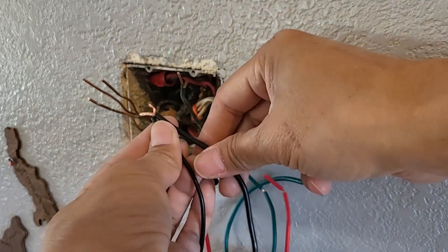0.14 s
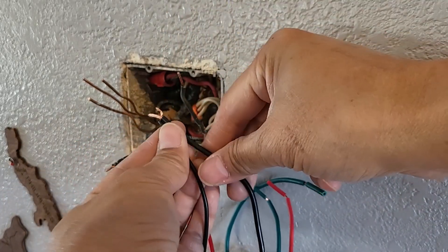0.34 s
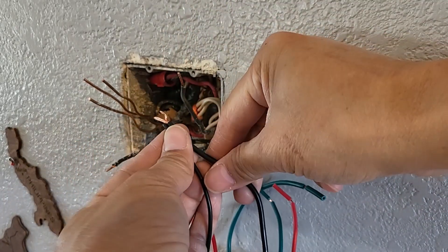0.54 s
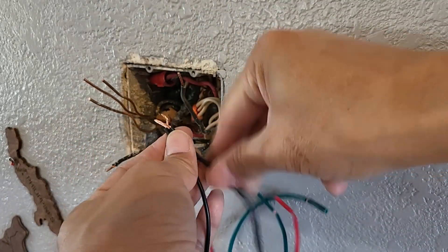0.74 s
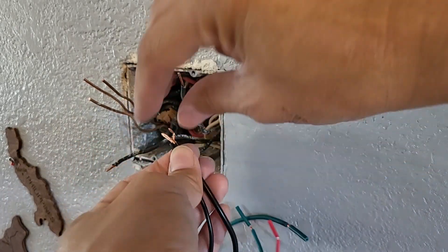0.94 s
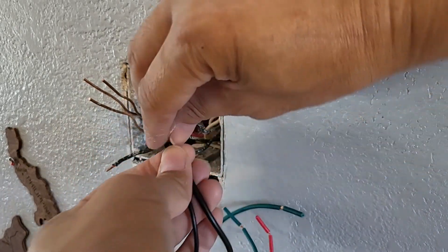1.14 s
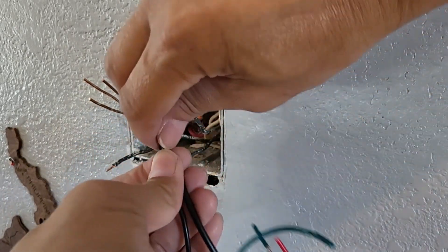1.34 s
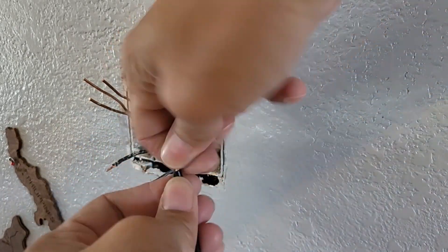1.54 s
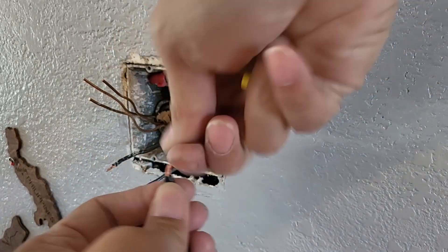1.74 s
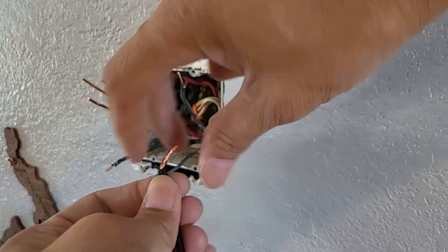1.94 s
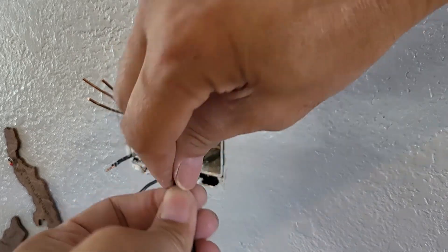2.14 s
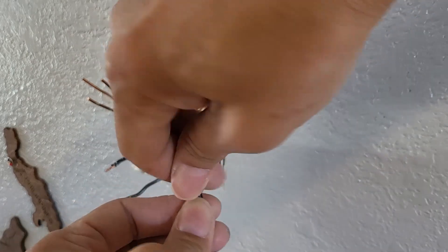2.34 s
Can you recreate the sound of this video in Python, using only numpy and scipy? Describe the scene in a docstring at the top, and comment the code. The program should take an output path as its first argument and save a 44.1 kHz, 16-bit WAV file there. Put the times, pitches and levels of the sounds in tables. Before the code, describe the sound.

Stiff copper wires handled at a wall box, with light knocks, scrapes and a bright chatter.

```python
"""In a small room, hands work on stiff copper wires at a junction box in a hollow wall, close by.
Cables scrape and rustle over the box, tick against it and thump the wall behind it.
Bare wire ends hit each other with a bright chatter, then fingers twist them together with faint
rubs, squeaks and ticks. Hits make things ring; sliding things catch and slip many times a second.
Soft air noise and a low hum lie under it all."""
import sys
import numpy as np
from scipy import signal
from scipy.fft import rfft, irfft, next_fast_len
from scipy.io import wavfile
from scipy.ndimage import map_coordinates

SR = 44100
rng = np.random.default_rng(int(sys.argv[2]) if len(sys.argv) > 2 else 0)


def store_wav(level_fs):
    """Save 16-bit WAV to argv[1]."""
    pcm = np.round(np.clip(np.atleast_2d(level_fs), -1, 1) * 32767)
    wavfile.write(sys.argv[1], SR, pcm.T.astype(np.int16))


N = 105840
T = np.arange(SR // 2) / SR  # the half-second clock of one sound [s]
TICK_ATTACK_S, SCRAPE_TOP_HZ = 0.00095, 3480
BOX_PAN_DB, FINGER_PAN_DB = -1.1, -0.2  # below zero leans right

# the notes the box rings at (pitch [Hz], level [dB], time to fade by 60 dB [s])
BOX_NOTES = [(1162, -11, 0.062), (1804, -14.5, 0.1), (2556, -11, 0.061), (2910, -1, 0.035),
             (3680, -15.5, 0.027), (5454, -8.5, 0.052), (7215, -7, 0.018)]
# the tone of skin sliding on wire (frequency [Hz], level [dB])
SKIN_TONE = [(500, 1), (2000, 0), (4500, -5), (7400, -2), (8800, -13.5), (12500, -12), (15500, -12.5)]


def amp(db):
    """Turn decibels into a number to multiply by."""
    return 10 ** (np.asarray(db) / 20)


def unit(x):
    """Scale a sound to an average (rms) strength of 1."""
    return x / np.sqrt(np.mean(x ** 2) + 1e-20)


def along(points, hz):
    """Read between (frequency, value) points, spaced the way we hear pitch."""
    f, v = np.transpose(points)
    return np.interp(np.log(hz + 1), np.log(f + 1), v)


def filtered(x, response):
    """Turn each frequency of x up or down by response(hz)."""
    n = x.shape[-1]
    m = next_fast_len(n + 8192)
    return irfft(rfft(x, m) * response(np.fft.rfftfreq(m, 1 / SR)), m)[..., :n]


def octaves(hz):
    """Octaves above 3000 Hz; everything under 500 Hz counts as 500 Hz."""
    return np.log2(np.maximum(hz, 500) / 3000)


def noise(tone, size, tilt=0):
    """Two unrelated noises with the given tone; tilt brightens them [dB per octave]."""
    white = rng.standard_normal((2, size))
    return unit(filtered(white, lambda hz: amp(along(tone, hz) + tilt * octaves(hz))))


def spread(pair):
    """Sound from all around: alike at both ears in the bass, unrelated in the treble."""
    # how alike left and right are (frequency [Hz], likeness [-1 to 1])
    likeness = [(60, 0.89), (200, 0.96), (550, -0.48), (1600, -0.32), (5000, -0.019)]
    turn = lambda hz: np.arccos(np.clip(along(likeness, hz), -1, 1)) / 2
    mid, side = filtered(pair, lambda hz: np.array([np.cos(turn(hz)), np.sin(turn(hz))]))
    return np.array([mid + side, mid - side])


def ring(notes, tilt=0, detune=0):
    """A struck thing rings with fading notes, a little different on every hit."""
    out = np.zeros((2, len(T)))
    for hz, db, fade_s in notes:
        level = amp(db + tilt * octaves(hz) + 2.5 * rng.standard_normal() - 60 * T / fade_s)
        pitch = hz * (1 + detune * rng.standard_normal())
        phase = rng.random() + 0.49 * rng.random((2, 1))  # each ear gets its own [cycles]
        out += level * np.sin(2 * np.pi * (pitch * T + phase))
    return out


def resonances(peaks, f):
    """How a body that favours some pitches answers at frequency f."""
    return sum((-1) ** k * amp(db) * 1j * f * width / (hz * hz - f * f + 1j * f * width)
               for k, (hz, width, db) in enumerate(peaks))


def stroke(length, body, smooth, slips_per_s=1300):
    """One slide: tiny random slips and some smooth hiss shake a body, swelling then fading."""
    slips = (rng.random(len(T)) < slips_per_s / SR) * amp(3 * rng.standard_normal(len(T)))
    grains = unit(slips * rng.standard_normal((2, len(T))))
    hiss = smooth * rng.standard_normal((2, len(T)))
    swell = np.interp(T / length, [0, 0.5, 1], [0, 1, 0]) ** 0.44
    return unit(filtered(grains + hiss, body)) * swell


def room_echo(echo_db):
    """The room's answer to a click: many reflections blur into fading noise."""
    # how long the room rings (frequency [Hz], time to fade by 60 dB [s])
    fade_times = [(100, 0.48), (260, 0.22), (700, 0.32), (1800, 0.38), (5000, 0.46), (12000, 0.24)]
    # the tone of the echo (frequency [Hz], level [dB])
    echo_tone = [(80, 1.5), (250, -8.5), (600, 3.5), (1800, -3), (5500, -5.5), (12000, -4)]
    hz, t, bands = signal.stft(rng.standard_normal((2, len(T))), SR, nperseg=256)
    fade_s = along(fade_times, hz)[:, None]
    tail = signal.istft(bands * amp(-60 * t / fade_s) / np.sqrt(fade_s), SR, nperseg=256)[1]
    tail = tail[:, :len(T)] * (1 - np.exp(-T / 0.0037))  # reflections build up
    tail = spread(tail / np.linalg.norm(tail[0]))
    tail = filtered(tail, lambda f: amp(along(echo_tone, f) + echo_db))
    return np.pad(tail, ((0, 0), (SR // 200, 0)))  # arrives 5 ms late


def add(out, s, sound, pan_db, echo_db):
    """Place a sound at s seconds, with its own room echo."""
    direct = sound * amp([[pan_db], [-pan_db]])
    echo = signal.fftconvolve(sound, room_echo(echo_db), axes=1)[:, :len(T)]
    start = round(s * SR)
    heard = (direct + echo)[:, max(-start, 0):N - start]
    out[:, max(start, 0):][:, :heard.shape[1]] += heard


def room_tone(air_db=-58.5, hum_hz=47.44, hum_db=-62.5):
    """Soft air noise and a low, slightly unsteady hum."""
    # the tone of the air noise (frequency [Hz], level [dB])
    air_tone = [(18, -46), (36, -25.5), (70, -7), (140, -14.5), (195, -7.5), (340, -14), (520, -22),
                (750, -21.5), (1100, -30), (1500, -33.5), (2900, -39), (4300, -48), (7400, -47.5),
                (8800, -62.5), (15500, -52)]
    t = np.arange(N) / SR
    drift = map_coordinates(rng.standard_normal(16), [t * 4])
    hum = np.sqrt(2) * np.sin(2 * np.pi * hum_hz * t + 0.083 * drift)
    air = unit(spread(noise(air_tone, N)))
    return amp(air_db) * air + amp(hum_db) * hum


def scrapes():
    """A cable catches and slips as it drags over the edge of the box."""
    # each drag (time [s], length [s], level [dB])
    drags = [(-.03, 0.11, -65.5), (.08, 0.086, -66), (0.319, 0.11, -71.5), (0.799, 0.1, -57.5),
             (0.932, 0.014, -44.5), (0.944, 0.019, -42), (0.953, 0.043, -48.5), (1.017, 0.016, -42),
             (1.04, 0.15, -73.5)]
    # pitches the scraped box favours (pitch [Hz], width [Hz], level [dB])
    edge_peaks = [(1130, 39, -12), (1465, 60, 11), (1848, 59, 13.5), (2240, 170, -2.5), (2575, 190, 3),
                  (2900, 1800, -1)]
    edge = lambda f: resonances(edge_peaks, f) / (1 + (f / SCRAPE_TOP_HZ) ** 2)
    out = np.zeros((2, N))
    for s, length, db in drags:
        add(out, s, amp(db) * stroke(length, edge, smooth=0.3), BOX_PAN_DB, echo_db=-5.5)
    return out


def squeaks(width_hz=180):
    """Copper slides on copper and squeaks around one pitch."""
    # each squeak (time [s], length [s], pitch [Hz], level [dB])
    slides = [(0.085, 0.0076, 3018, -46), (1.54, 0.012, 3103, -55.5), (1.539, 0.015, 2095, -55.5),
              (1.722, 0.095, 2710, -73), (1.786, 0.029, 1915, -62), (1.823, 0.028, 2070, -66),
              (2.114, 0.02, 4640, -71.5)]
    out = np.zeros((2, N))
    for s, length, hz, db in slides:
        peak = lambda f: resonances([(hz, width_hz, 0)], f) ** 2
        add(out, s, amp(db) * stroke(length, peak, smooth=0.3), FINGER_PAN_DB, echo_db=-14)
    return out


def box_tick(tilt, crack_db=3.5, crack_fade_s=0.044):
    """The tapped box rings and cracks; each spot on it favours other frequencies."""
    # the tone of the crack (frequency [Hz], level [dB])
    crack_tone = [(300, 2.5), (900, -5), (3000, -6), (4600, -7.5), (5800, -6.5), (7400, -11.5), (8800, -25),
                  (15000, -36)]
    notes = ring(BOX_NOTES, tilt)
    crack = amp(crack_db - 60 * T / crack_fade_s) * noise(crack_tone, len(T), tilt)
    spot_tone = [(hz, 3.5 * rng.standard_normal()) for hz in np.geomspace(700, 9000, 16)]
    tick = filtered(notes + crack, lambda hz: amp(along(spot_tone, hz)))
    return tick * (1 - np.exp(-T / TICK_ATTACK_S))


def knocks(push_s=0.0026, wall_lag_s=0.001084, bass_cut_hz=62):
    """A cable ticks the box, then thumps the wall; hard hits also ring the hollow of the box."""
    # each hit (time [s], tick level [dB], brightness [dB per octave], thump level [dB])
    hits = [(0.088, -53, -1.5, -57), (0.1203, -53, -1.5, -52), (0.2297, -45.5, 1.5, -20),
            (0.2382, -56.5, 0.5, -45), (.298, -74, -8, -31.5), (.352, -65.5, -4.5, -43),
            (0.3809, -68, -4, -38.5), (0.4467, -60, -6, -39), (0.4679, -58.5, -4.5, -38.5),
            (0.5466, -61.5, -1, -46), (0.559, -68.5, -4, -40.5), (0.6758, -70.5, -3, -36),
            (0.7253, -54.5, 0.5, -34), (0.7442, -54, -3.5, -31), (0.788, -49, 1.5, -38.5),
            (0.8029, -51.5, 2, -26.5), (0.8349, -57, -3, -34.5), (.848, -87, 5, -36.5),
            (.873, -55, -3.5, -41), (0.9495, -41, -1.5, -26.5), (0.963, -48.5, 4, -30),
            (1.02, -49, -7, -39), (2.202, -84, 5, -47)]
    # the notes of the hollow wall (pitch [Hz], level [dB], time to fade by 60 dB [s])
    wall_notes = [(100.2, -20, 0.096), (129.7, -12, 0.14), (163.7, 5, 0.042), (203, -10.5, 0.0726),
                  (292.3, -8.5, 0.068), (356, -28.5, 0.0057)]
    # the notes of the hollow of the box (pitch [Hz], level [dB], time to fade by 60 dB [s])
    hollow_notes = [(1095, -1, 0.043), (1179, -8, 0.096), (1465, -13, 0.06), (1783, -9, 0.078)]
    push = 1 - np.exp(-(T / push_s) ** 2)
    wall = -sum(amp(db - 60 * T / fade_s) * np.sin(2 * np.pi * hz * T) for hz, db, fade_s in wall_notes)
    wall = filtered(wall * push, lambda hz: hz ** 2 / np.hypot(hz ** 2, bass_cut_hz ** 2))
    out = np.zeros((2, N))
    for s, tick_db, tilt, thump_db in hits:
        add(out, s, amp(tick_db) * box_tick(tilt), BOX_PAN_DB, echo_db=-6.5)
        hollow = amp(1.7 * thump_db) * ring(hollow_notes) * push  # grows faster than the thump
        add(out, s + wall_lag_s, amp(thump_db) * np.array([wall, wall]), pan_db=-1.77, echo_db=2)
        add(out, s + wall_lag_s, hollow, BOX_PAN_DB, echo_db=-15)
    return out


def rustles(width_hz=150):
    """The cable's covering slides against the box and stirs its notes."""
    # each rustle (time [s], length [s], level [dB])
    slides = [(.722, 0.097, -63.5), (0.776, 0.053, -56.5)]
    peaks = [(hz, width_hz, db) for hz, db, _ in BOX_NOTES]
    box = lambda f: resonances(peaks, f) / (1 + (f / SCRAPE_TOP_HZ) ** 2)
    out = np.zeros((2, N))
    for s, length, db in slides:
        add(out, s, amp(db) * stroke(length, box, smooth=0.2), BOX_PAN_DB, echo_db=-5.5)
    return out


def chatter(snap_fade_s=0.02):
    """Bare copper ends bounce off each other, each time with a snap and a short bright ring."""
    # each touch (time [s], ring level [dB], snap level [dB])
    touches = [(0.931, -62, -45.5), (0.9522, -44, -32), (0.9556, -37, -29.5), (0.9683, -38, -38.5),
               (0.9829, -40.5, -40.5), (0.989, -42, -42.5), (1, -53, -49)]
    # the notes of a bare end (pitch [Hz], level [dB], time to fade by 60 dB [s])
    copper_notes = [(5385, -1, 0.044), (5530, -7, 0.035), (5630, -2, .03), (5540, -9, 0.022)]
    # the tone of the snap (frequency [Hz], level [dB])
    snap_tone = [(500, -35), (1700, 3.5), (3000, 4.5), (4600, -2), (6000, -0.5), (8500, -8.5),
                 (15500, -13.5)]
    onset = 1 - np.exp(-T / TICK_ATTACK_S)
    out = np.zeros((2, N))
    for s, ring_db, snap_db in touches:
        add(out, s, amp(ring_db) * ring(copper_notes, detune=0.012) * onset, pan_db=-3, echo_db=-9)
        snap = amp(snap_db - 60 * T / snap_fade_s) * noise(snap_tone, len(T))
        add(out, s, snap * onset, pan_db=0, echo_db=-4.5)
    return out


def rubs():
    """Fingers slide along a pinched wire with a soft hiss; the first, very short slide is instead a quick slip
    in the middle of the cable's big drag over the box."""
    # each rub (time [s], length [s], level [dB], brightness [dB per octave])
    slides = [(0.943, 0.008, -47.5, -1.5), (1.155, 0.088, -68, 7.5), (1.484, 0.12, -73.5, 2.5),
              (1.61, 0.047, -68, 1.5), (1.743, 0.12, -68, 2), (1.783, 0.023, -56, 2),
              (2.091, 0.056, -69, -1)]
    # pitches the pinched wire favours (pitch [Hz], width [Hz], level [dB])
    wire_peaks = [(1930, 140, 5), (2860, 97, 9), (5800, 120, 4.5)]
    wire = lambda f: np.hypot(1, abs(resonances(wire_peaks, f)))
    out = np.zeros((2, N))
    for s, length, db, tilt in slides:
        skin = lambda f: amp(along(SKIN_TONE, f) + tilt * octaves(f)) * wire(f)
        add(out, s, amp(db) * stroke(length, skin, smooth=1.1), FINGER_PAN_DB, echo_db=-7.5)
    return out


def strand_ticks(fade_s=0.012):
    """The twisted ends slip over each other with tiny ticks."""
    # each slip (time [s], level [dB], brightness [dB per octave])
    slips = [(1.494, -58, 16), (1.5002, -55, -3), (1.569, -63, 7), (1.578, -58, -1)]
    out = np.zeros((2, N))
    for s, db, tilt in slips:
        tick = amp(db - 60 * T / fade_s) * noise(SKIN_TONE, len(T), tilt)
        add(out, s, tick, FINGER_PAN_DB, echo_db=-9)
    return out


def scene():
    """All the hits and slides, over the sound of the room."""
    return knocks() + chatter() + scrapes() + rustles() + rubs() + squeaks() + strand_ticks() + room_tone()


def record(dry):
    """Cut away the very highest treble."""
    return filtered(dry, lambda hz: hz < 15900)


dry = scene()
out = record(dry)
store_wav(out)
```